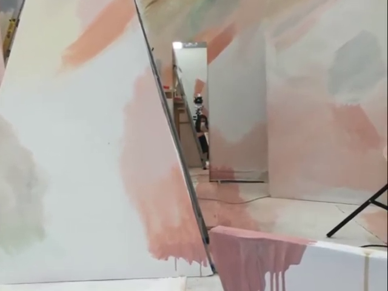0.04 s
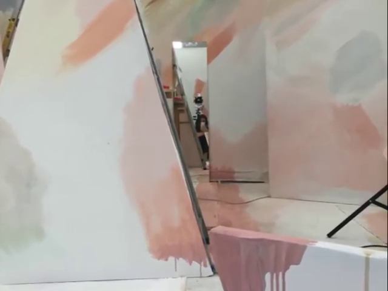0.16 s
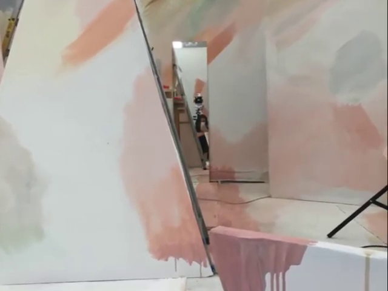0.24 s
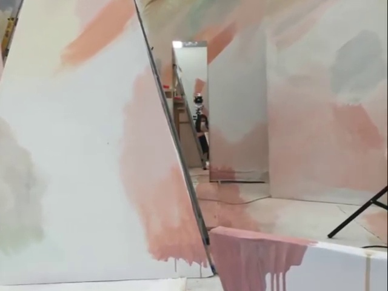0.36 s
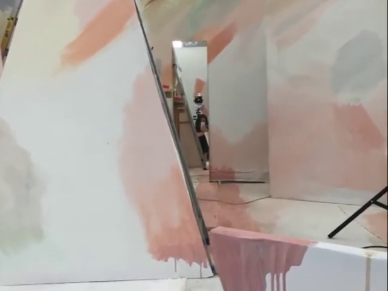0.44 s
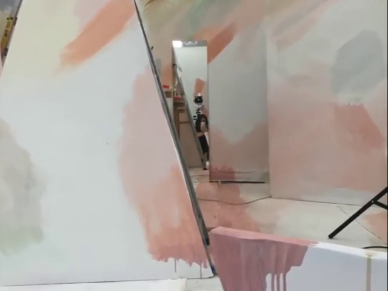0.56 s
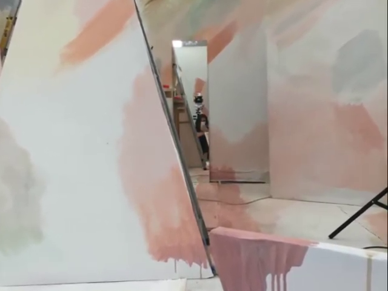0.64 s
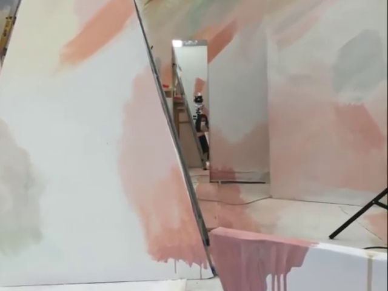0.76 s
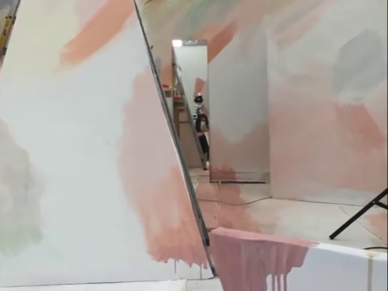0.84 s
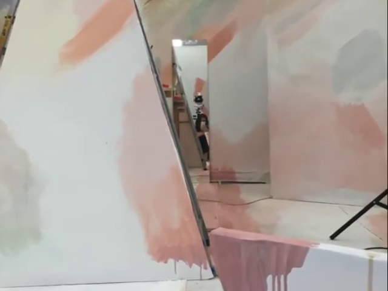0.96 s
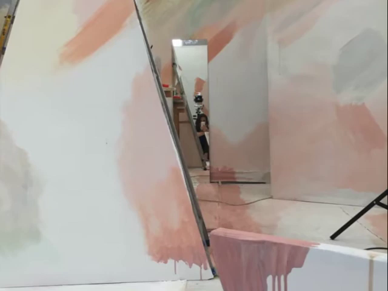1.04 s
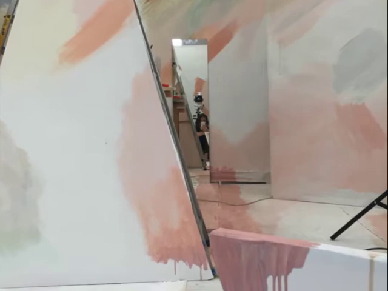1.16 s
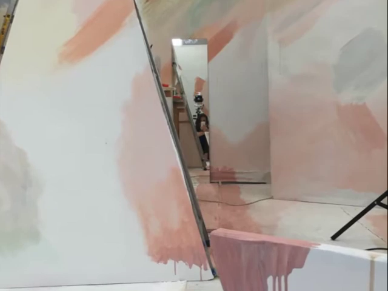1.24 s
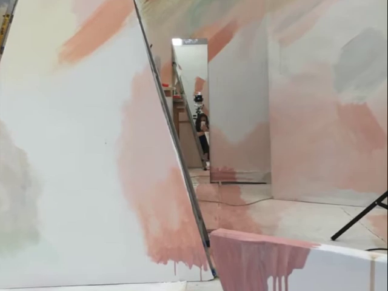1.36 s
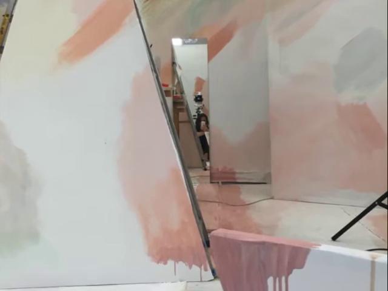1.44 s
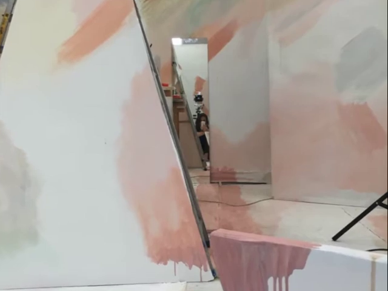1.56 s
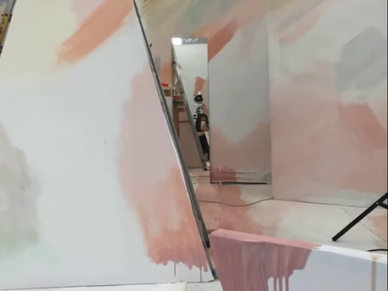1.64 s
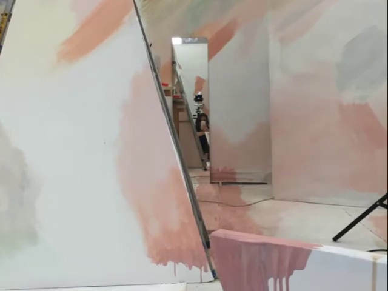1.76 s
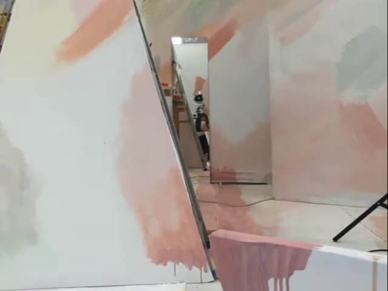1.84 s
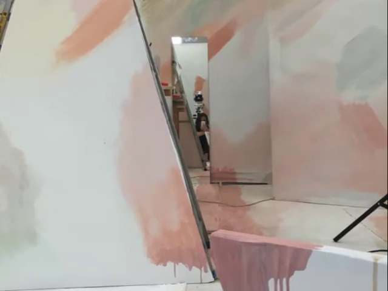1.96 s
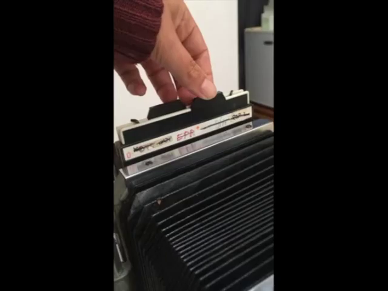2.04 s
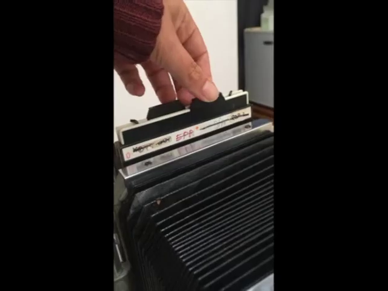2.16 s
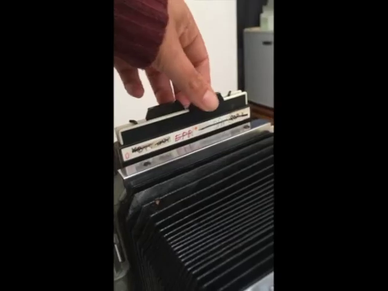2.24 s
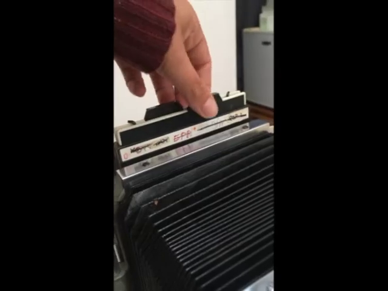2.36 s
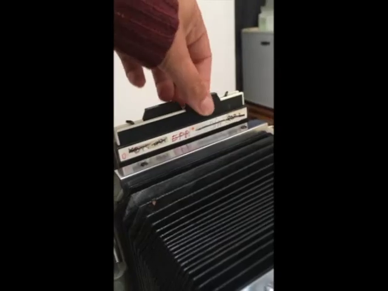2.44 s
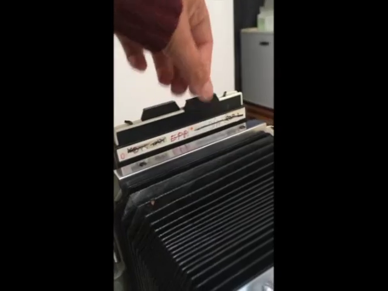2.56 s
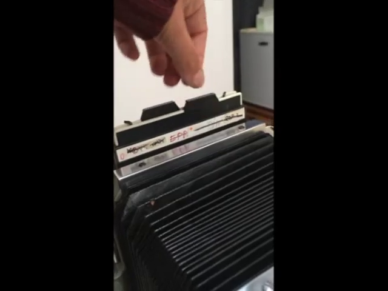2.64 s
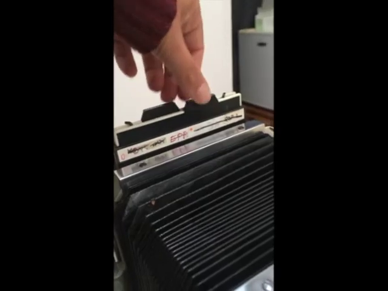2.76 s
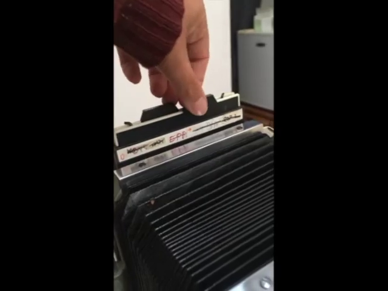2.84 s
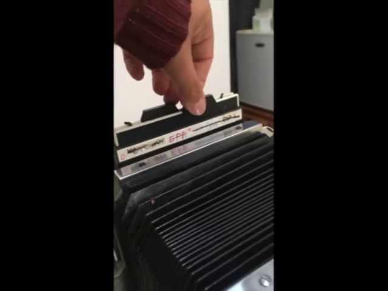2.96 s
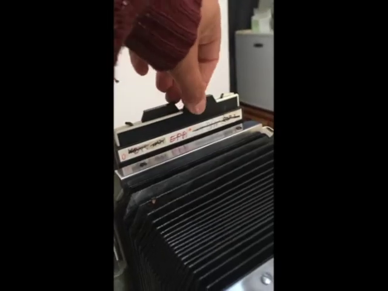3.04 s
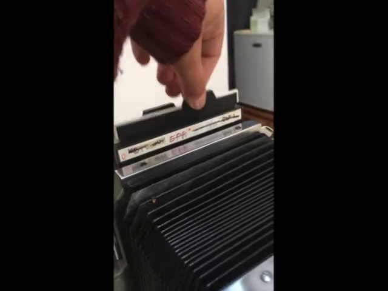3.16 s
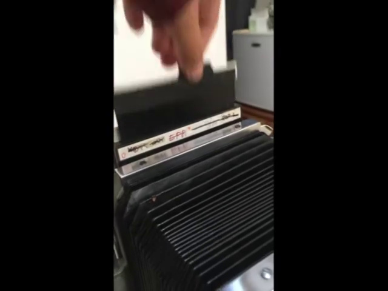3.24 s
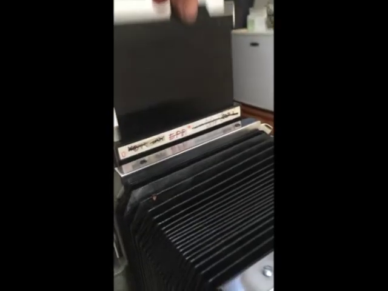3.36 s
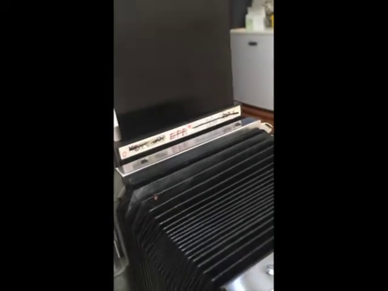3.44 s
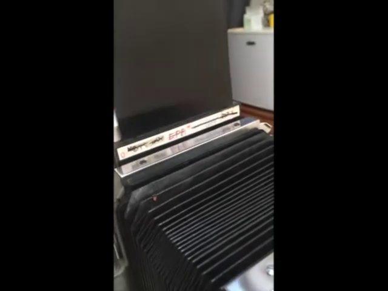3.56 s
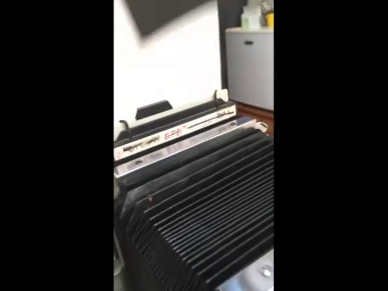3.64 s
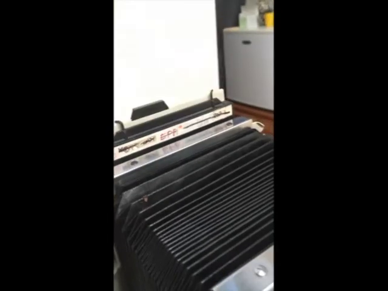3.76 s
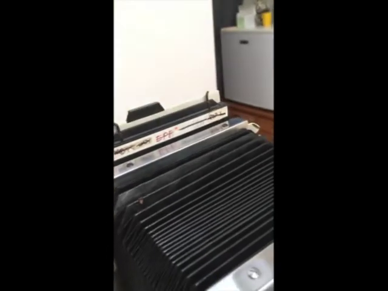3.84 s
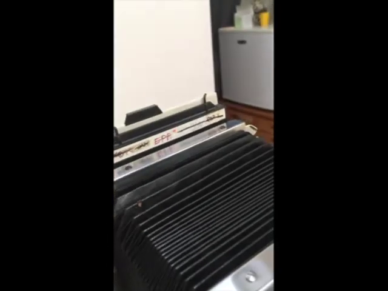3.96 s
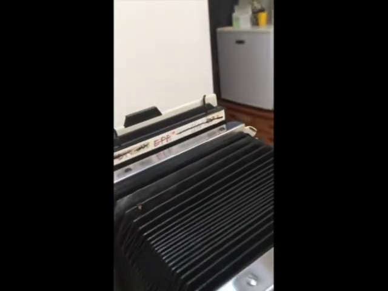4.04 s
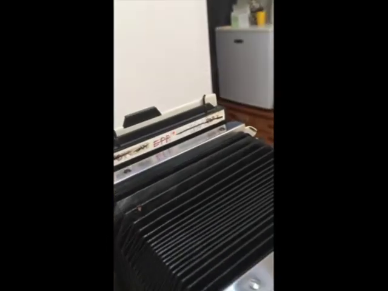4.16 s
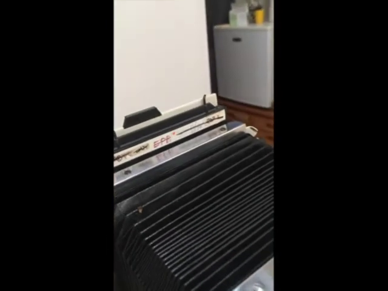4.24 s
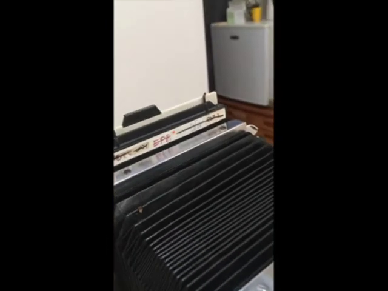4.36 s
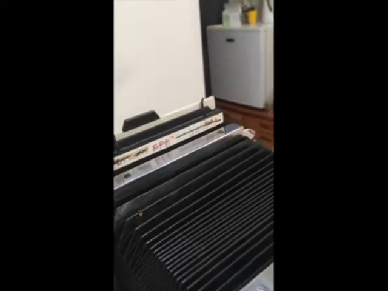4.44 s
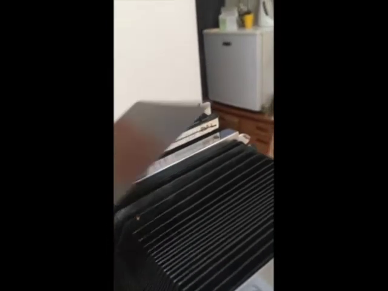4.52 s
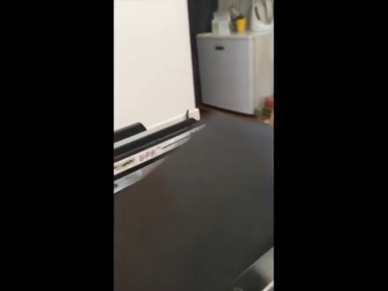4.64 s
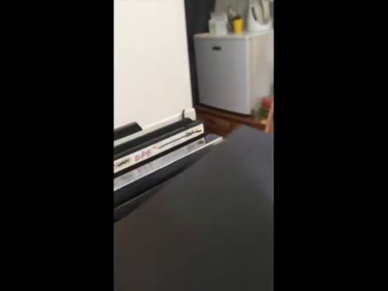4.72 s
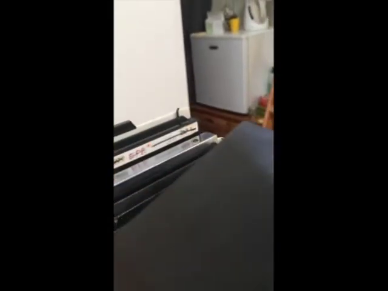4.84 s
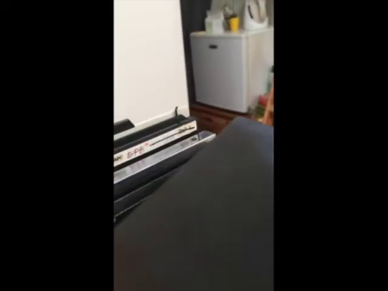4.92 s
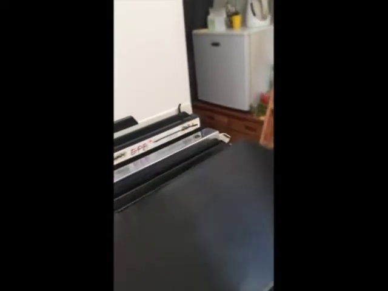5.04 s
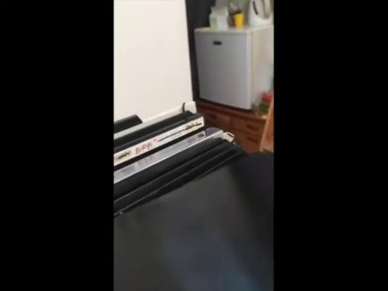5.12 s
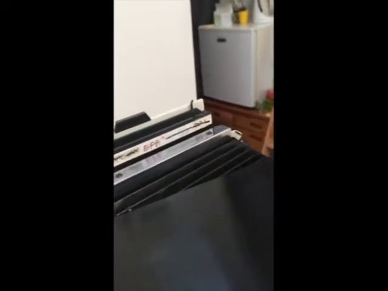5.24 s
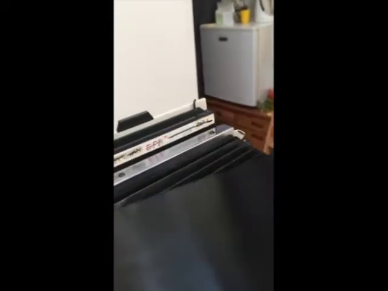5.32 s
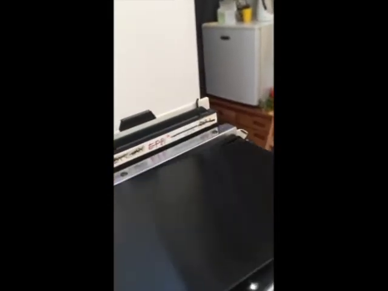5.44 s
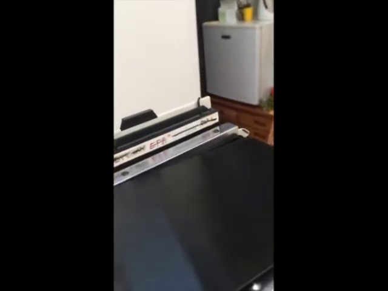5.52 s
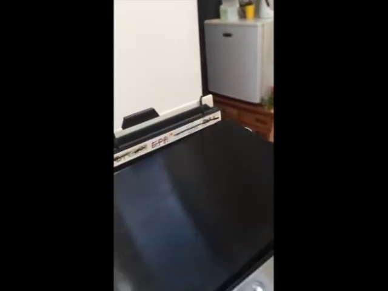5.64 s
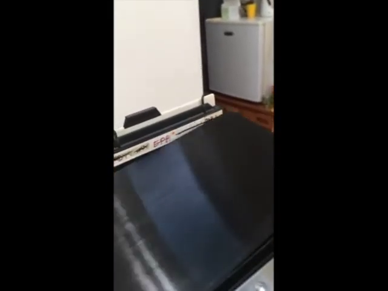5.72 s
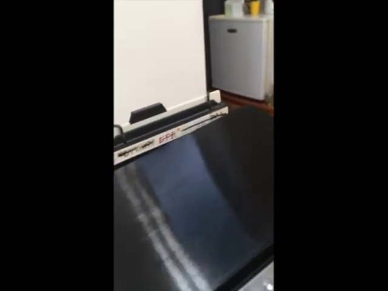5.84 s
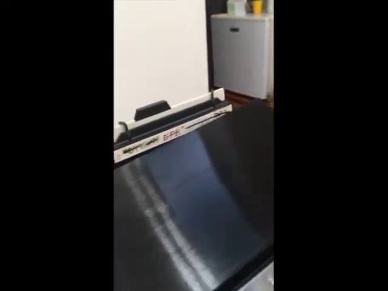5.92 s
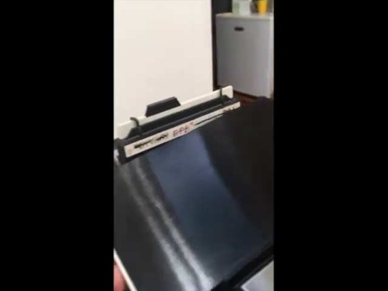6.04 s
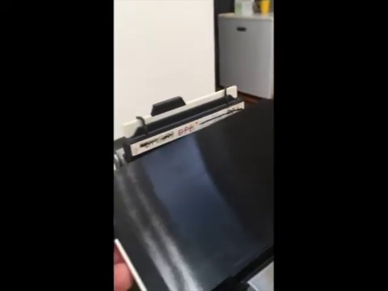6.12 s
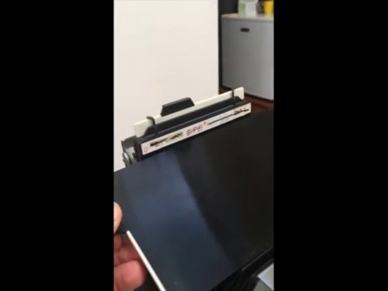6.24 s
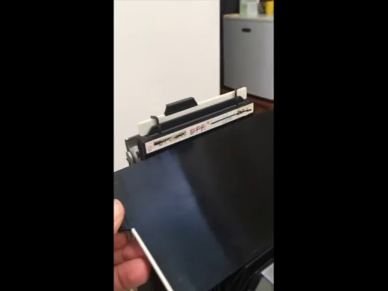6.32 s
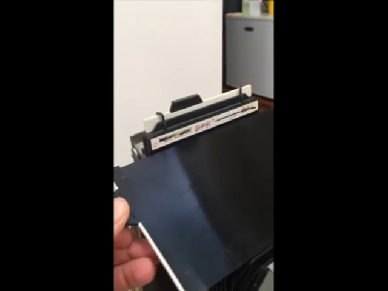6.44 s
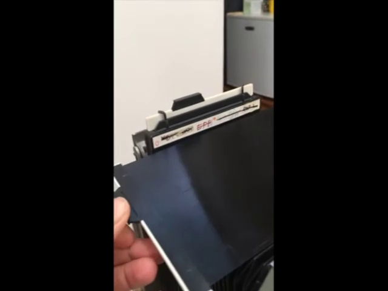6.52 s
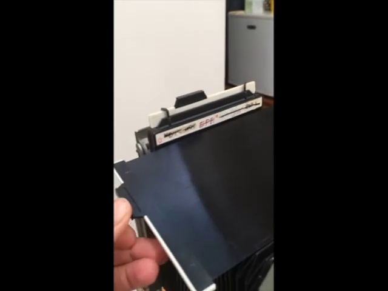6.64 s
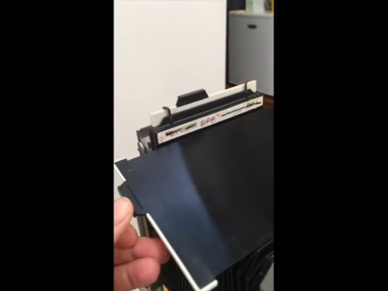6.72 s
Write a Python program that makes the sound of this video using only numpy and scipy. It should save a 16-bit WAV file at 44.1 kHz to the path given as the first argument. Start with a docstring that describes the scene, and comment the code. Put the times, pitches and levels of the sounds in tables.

```python
"""Cloth and soles rustle over a low wavering drone, then soft footfalls come: noise swept by rise and decay.
After a short silent splice, in a second quiet studio room, a plastic dark slide is gripped, drawn scraping
out of a film holder, tapped on the camera and rubbed along it: ticks and dense friction grains ring the
modes of holder and camera body, and the room adds reflections.
Narrow-band noise makes the rumble, and shaped noise the room tone and the hiss of a small microphone."""
import sys
import numpy as np
from scipy import signal
from scipy.fft import rfft, irfft
from scipy.io import wavfile

SR = 44100
rng = np.random.default_rng(int(sys.argv[2]) if len(sys.argv) > 2 else 0)


def dump_mix(stems):
    """Bounce the given channels to the path in sys.argv[1] as a 16-bit WAV at rate SR."""
    frames = np.atleast_2d(stems).T  # one column per channel
    limited = np.clip(frames, -1, 1)  # hard clip at full scale
    pcm = np.round(limited * 32767).astype(np.int16)
    wavfile.write(sys.argv[1], SR, pcm)


def natural_amplitude(level_db):
    """Convert a level in decibels to a linear amplitude factor, elementwise."""
    exponent = np.asarray(level_db, float) / 20
    return 10 ** exponent


N = 299144


def rms_one(x):
    """Normalisation: equal mean power, so that the rms is 1."""
    return x / np.sqrt(np.mean(x ** 2) + 1e-20)


def cut(x, hz, kind, order=2):
    """Butterworth filtering: a maximally flat pass band."""
    return signal.sosfilt(signal.butter(order, hz, kind, fs=SR, output="sos"), x)


def coloured(x, spectrum):
    """Spectral shaping: a steady noise weighted by a curve over log frequency; rms 1."""
    hz, db = np.transpose(spectrum)
    grid_hz = np.maximum(np.fft.rfftfreq(len(x), 1 / SR), 1)
    gain = natural_amplitude(np.interp(np.log(grid_hz), np.log(hz), db))
    return rms_one(irfft(rfft(x) * gain, len(x)))


def in_time(curve):
    """Level envelope: a dB curve as gain per sample, silent outside its span."""
    s, db = np.transpose(curve)
    return natural_amplitude(np.interp(np.arange(N) / SR, s, db, left=-200, right=-200))


def drift(rate_hz):
    """Random modulation: noise low-passed near rate_hz; rms 1."""
    step = 40   # samples per slow value
    r = np.exp(-2 * np.pi * rate_hz * step / SR)
    slow = signal.lfilter([1], [1, -2 * r, r * r], rng.standard_normal(N // step + 2002))[2000:]
    return np.interp(np.arange(N) / step, np.arange(len(slow)), rms_one(slow))


def ring(force, hz, t60_s):
    """Damped resonator: a unit click sets a decaying sine of initial height 1 ringing."""
    r, w = natural_amplitude(-60 / (t60_s * SR)), 2 * np.pi * hz / SR
    return signal.lfilter([0, np.sin(w)], [1, -2 * r * np.cos(w), r * r], force + 1e-18)


def resonance(x, hz, width_hz):
    """Resonant filtering: the bandwidth sets the decay time; rms 1."""
    return rms_one(ring(x, hz, np.log(1000) / np.pi / width_hz))


# the splice: times in s at which the fade out begins, silence begins, the fade in begins, full level returns
SPLICE_S = (1.977, 1.982, 2.007, 2.011)
# spectra of room tone and microphone hiss: pitch_hz [Hz], level_db [dB per Hz, relative]
FIRST_ROOM = [(70, -36), (105, 4), (200, -7.5), (450, -18), (1000, -20.5), (2300, -24.5), (3500, -35),
              (16400, -34)]
SECOND_ROOM = [(70, -22.5), (105, -4), (200, -10.5), (330, -18.5), (520, -27.5), (800, -28), (1050, -25.5),
               (2200, -30.5), (3200, -36.5), (5000, -40.5), (9000, -38.5), (16400, -36)]
FIRST_DB, SECOND_DB = -49.5, -53


def room_tone():
    """Stationary noise: each room has its own steady spectrum."""
    first = natural_amplitude(FIRST_DB) * coloured(rng.standard_normal(N), FIRST_ROOM)
    second = natural_amplitude(SECOND_DB) * coloured(rng.standard_normal(N), SECOND_ROOM)
    return np.where(np.arange(N) / SR < SPLICE_S[2], first, second)


def drone(hz, width_hz, evenness):
    """Narrow-band noise: dividing by its envelope leaves it wandering more in pitch than level; rms 1."""
    x = resonance(resonance(rng.standard_normal(N), hz, width_hz), hz, width_hz)
    envelope = np.abs(signal.hilbert(x))
    return rms_one(x / (envelope + 0.18) ** evenness)


# levels of the two drones: time_s [s], level_db [dB]
DEEP_DRONE = [(0, -45.5), (.7, -48), (.85, -41.5), (1.5, -49.5), (5.2, -56), (5.4, -43), (6.78, -42.5)]
UPPER_DRONE = [(0, -39.5), (.7, -38), (.85, -46.5), (2.3, -49), (3.2, -47), (6.78, -46)]


def rumble():
    """Low-frequency noise from the building or distant traffic: two drones, the upper later higher and looser."""
    early = np.arange(N) / SR < UPPER_DRONE[2][0]
    upper = np.where(early, drone(72.8, 7.3, 0.8), drone(84.7, 43.3, 0.76))
    return in_time(DEEP_DRONE) * drone(44.7, 5.2, 0.94) + in_time(UPPER_DRONE) * upper


# rustles of cloth and soles: peak_s [s], level_db [dB]
SHUFFLES = [(0, -43.5), (.19, -53.5), (.61, -52), (.76, -49), (.99, -57), (1.3, -59.5)]
# spectrum of the rustles: pitch_hz [Hz], level_db [dB per Hz, relative]
SHUFFLE_COLOUR = [(700, 5), (1500, 0.5), (3000, -4), (5000, -8), (15500, -14.5)]
SHUFFLE_RISE_DB_PER_S, SHUFFLE_FALL_DB_PER_S = 195, 139


def shuffle():
    """Exponential envelopes: soft noise swells to each rustle and fades after it."""
    t = np.arange(N) / SR
    level = np.zeros(N)
    for s, db in SHUFFLES:
        drop_db = np.where(t < s, SHUFFLE_RISE_DB_PER_S * (s - t), SHUFFLE_FALL_DB_PER_S * (t - s))
        level += natural_amplitude(db - drop_db)
    return level * coloured(rng.standard_normal(N), SHUFFLE_COLOUR)


# footfalls in the first room: start_s [s], level_db [dB, relative], cutoff_hz [Hz, dullness]
STEPS = [(.581, -41, 780), (.597, -43, 525), (0.966, -43.5, 320)]
STEP_T60_S = 0.45


def steps():
    """Impact noise: dull thuds, fuller at the floor's resonances, swell fast and die with the room."""
    out, t = np.zeros(N), np.arange(SR // 2) / SR
    for (s, level_db, cutoff_hz), noise in zip(STEPS, rng.standard_normal((len(STEPS), len(t)))):
        thud = rms_one(cut(cut(noise, cutoff_hz, "low", order=4), 62, "high"))
        thud += 2.0 * resonance(noise, 220, 53) + 1.13 * resonance(noise, 162, 20)
        at = round(s * SR)
        out[at:at + len(t)] += natural_amplitude(level_db - 60 * t / STEP_T60_S) * np.minimum(t / 0.0016, 1) * thud
    return out


def gate(start_s, length_s):
    """Amplitude envelope of one touch: quick attack, hold, exponential release; gain 0-1."""
    out, at = np.zeros(N), round(start_s * SR)
    t = np.arange(SR // 4) / SR
    attack_s, release_s = 0.012, 0.0045
    out[at:at + len(t)] = np.clip(t / attack_s, 0, 1) * np.exp(-np.maximum(t - length_s, 0) / release_s)
    return out


# squeaks and brushes of a finger on the plate:
# start_s [s], length_s [s], pitch_hz [Hz, band centre], width_hz [Hz], level_db [dB]
SQUEAKS = [(2.21, 0.066, 5400, 2600, -63), (5.348, 0.115, 5540, 180, -56.5), (5.33, .075, 4290, 350, -52),
           (5.434, 0.024, 3380, 330, -40), (5.488, 0.017, 2980, 350, -48.5)]


def squeaks():
    """Friction excitation: noise narrowed to one singing region of the plate."""
    noise = rng.standard_normal(N)
    out = np.zeros(N)
    for s, length_s, hz, width_hz, db in SQUEAKS:
        band = cut(noise, [hz - width_hz / 2, hz + width_hz / 2], "band")
        out += natural_amplitude(db) * gate(s, length_s) * rms_one(band)
    return out


def strike(force, modes, centre_hz, width_oct, chance):
    """Modal excitation: modes near a centre ring; grip and place vary their strength and pitch; peak 1."""
    rung = np.zeros(len(force))
    for (hz, db, t60_s), gain_db, detune in zip(modes, 2 * chance, 1 + .02 * chance[::-1]):
        off_centre_db = 5.8 * (np.log2(hz / centre_hz) / width_oct) ** 2
        rung += natural_amplitude(db + gain_db - off_centre_db) * ring(force, hz * detune, t60_s)
    return rung / np.abs(rung).max()


# contacts of slide and fingers on holder and camera:
# start_s [s], level_db [dB, relative], pitch_hz [Hz, centre of ring], crack_db [dB, relative], chatter_ms [ms]
CONTACTS = [(2.35, -52.5, 840, -0.5, 1.3), (2.485, -21, 2600, -12.5, 2.6), (2.762, -41.5, 1490, -15.5, 4),
            (3.076, -14.5, 1300, -17, 1.3), (3.121, -20.5, 2004, -25, 6.6), (3.462, -5, 2348, -12.5, 2),
            (3.505, -12, 1150, -15, 3.1), (3.527, -18, 2600, -8.5, 2.3), (3.543, -22, 980, -2.5, 1.1),
            (4.468, 3.5, 2480, -15, 0.97), (4.479, -4, 1900, -10.5, 1.2), (4.484, -15, 960, -13.5, 1),
            (4.754, 2.5, 1038, -14, 1.5), (4.757, -9.5, 925, -33, 3), (4.765, -7, 1420, -16, 0.64),
            (4.823, -5.5, 1100, -15, 2.6), (4.909, -27.5, 600, -18.5, 5.8), (5.099, -25, 1140, -27, 5.3),
            (5.18, -23, 760, -13, 1.66), (5.218, -31.5, 900, -17, 5), (5.248, -29, 950, -23, 7),
            (5.572, -5, 4100, -8, 0.92), (5.589, -19.5, 1020, -8, 1.4), (5.614, -25, 900, -8, 2.5),
            (5.628, -21, 1030, -10, 1.5), (5.932, -25, 1440, -15, 1.7), (5.942, -18, 900, -14, 1.17),
            (5.948, -18, 1230, -23.5, 2.04), (6.106, -31, 820, -23, 3.7), (6.21, -29, 1350, -19, 3.1)]
# the slide's edge catches in the slot while drawn: start_s [s], level_db [dB, relative], pitch_hz [Hz]
CATCHES = [(3.165, -23, 4400), (3.178, -27, 870), (3.201, -23, 2220), (3.229, -24.5, 1640),
           (3.284, -24, 3400), (3.308, -24, 3070), (3.336, -23, 3270), (3.38, -24, 2890)]
CATCH_CRACK_DB, CATCH_CHATTER_MS = -18, 1.6   # the same two columns for every catch
# modes of the holder and slide: pitch_hz [Hz], level_db [dB, relative], t60_s [s, ringing free]
HOLDER = [(790, -10, 0.024), (933.4, -7.5, 0.11), (1178, -6.5, 0.02), (1420, -1, 0.011), (1765, -2, 0.018),
          (2317, 4.5, 0.0099), (2710, 11, 0.0054), (3186, 11, 0.014), (3576, 1, 0.02), (4250, 6, 0.019),
          (5590, 13, 0.0057), (6370, 7, 0.017), (10050, 4, 0.019)]
# spans when no hand damps the holder and it rings on: start_s [s], end_s [s]
LOOSE_S = [(3.5, 3.6), (4.46, 4.5), (5.56, 5.6)]
SETTLE_DB, SETTLE_S, SETTLE_HZ = -24, 0.014, (600, 2600)


def contacts():
    """Impact excitation: a tick inside a short dying chatter rings the holder and cracks in the treble."""
    size, lead = 4096, 40   # samples
    out, t = np.zeros(N + size), np.arange(size) / SR
    rows = CONTACTS + [(*row, CATCH_CRACK_DB, CATCH_CHATTER_MS) for row in CATCHES]
    # a hand on the holder stops its longer rings
    held = [(hz, db, min(.55 * t60_s, .025)) for hz, db, t60_s in HOLDER]
    noises = rng.standard_normal((len(rows), size))
    for (s, level_db, centre_hz, crack_db, chatter_ms), noise in zip(rows, noises):
        # the edges graze for a millisecond before they meet
        force = .5 * noise * np.exp(-1000 * t / chatter_ms) * np.minimum(np.arange(size) / lead, 1) ** 3
        force[lead] = 1
        force = cut(force, max(600, 0.45 * centre_hz), "high")   # a thin plate radiates no bass
        modes = HOLDER if any(a < s < b for a, b in LOOSE_S) else held
        rung = strike(force, modes, centre_hz, 0.72, noise[-40:])
        # after a contact the parts rattle dully into place
        settle = rms_one(cut(noise[::-1], SETTLE_HZ, "band")) * np.exp(-t / SETTLE_S) * np.minimum(t / 0.0012, 1)
        crack = cut(force, [5500, 15500], "band")
        here = slice(round(s * SR), round(s * SR) + size)
        out[here] += natural_amplitude(level_db - 3.0) * rung
        out[here] += natural_amplitude(level_db + SETTLE_DB) * settle
        out[here] += natural_amplitude(level_db + crack_db + 14.0) * crack / np.abs(crack).max()
    return out[:N]


def snags():
    """Sparse impulses: now and then the edge catches and briefly rings one mode of the holder; rms 1."""
    ticks = (rng.random(N) < 420 / SR) * natural_amplitude(rng.uniform(-6, 6, N))   # about 420 per s
    dealt = rng.integers(0, len(HOLDER), N)   # which mode each tick rings
    out = np.zeros(N)
    for k, (hz, db, t60_s) in enumerate(HOLDER):
        out += ring(ticks * (dealt == k), hz, min(.45 * t60_s, .009))
    return rms_one(out)


# short rubs of slide and fingers, each changing steadily by swell_db before it stops:
# start_s [s], length_s [s], hiss_db [dB, fine hiss at the end], swell_db [dB], weight_db [dB, grit over hiss]
SCUFFS = [(2.388, 0.096, -49.5, 17.5, -2.5), (2.479, 0.014, -38, 5, 5), (2.506, 0.024, -51, -6.5, 6.5),
          (3.446, 0.036, -30.5, -9, -19), (3.478, 0.014, -16, 6, -20.5), (3.502, 0.028, -47.5, 10, 10.5),
          (4.858, 0.11, -39.5, 17, -15.5), (4.972, .07, -61.5, -10, -0.5), (5.262, 0.034, -39, 9, -30),
          (5.304, 0.034, -40, 2, -19), (5.342, 0.077, -48, -10, -35), (5.432, 0.033, -52, -6, -12),
          (5.479, .046, -43, 5.5, -18), (5.527, 0.018, -28, -14, -7), (5.572, 0.025, -35.5, 24, -14),
          (5.616, 0.023, -40, -6.5, -6.5), (5.923, 0.026, -42, 14, 7), (6.113, 0.05, -79, -1.5, 25)]
# the slide drawn out of its slot, hissing more as it speeds up: time_s [s], hiss_db [dB]
PULL = [(3.074, -52), (3.115, -43.5), (3.2, -34), (3.375, -32.5), (3.4, -28.5), (3.45, -37.5)]
PULL_GRIT_DB, GRIT_FADE_DB_PER_S = -42.5, 25   # grit at the start, fading as the slide frees
PULL_SQUEAL_DB = -35   # at the loudest hiss
SQUEAL_DB, SQUEAL_PER_WEIGHT = 2.5, 0.85   # squeal over hiss grows with weight until grit takes over
SHEEN_DB, SHEEN_PER_WEIGHT = -7, -0.088   # the lighter the touch, the more of the very top


def rubbing_levels():
    """Friction level: grit, squeal, hiss and sheen follow each scuff's weight and the speed of the pull."""
    t, pull = np.arange(N) / SR, in_time(PULL)
    drawn = pull > natural_amplitude(-150)
    grit = natural_amplitude(PULL_GRIT_DB - GRIT_FADE_DB_PER_S * (t - PULL[0][0]))
    out = drawn * np.array([grit, natural_amplitude(PULL_SQUEAL_DB) * pull / pull.max(), pull, 0 * pull])
    for s, length_s, hiss_db, swell_db, weight_db in SCUFFS:
        level = gate(s, length_s) * natural_amplitude(hiss_db - swell_db * np.clip(1 - (t - s) / length_s, 0, 1))
        squeal_db = SQUEAL_DB + SQUEAL_PER_WEIGHT * min(weight_db, 0)
        sheen_db = SHEEN_DB + SHEEN_PER_WEIGHT * weight_db
        out += level * natural_amplitude([[weight_db], [squeal_db], [0], [sheen_db]])
    return out


# spectrum of the rubbing hiss: pitch_hz [Hz], level_db [dB per Hz, relative]
RUB_HISS = [(5000, -16.5), (6500, -4.5), (11400, 2), (15300, 3.5), (16400, -32)]
GRIT_HZ, SQUEAL_HZ, SHEEN_HZ = (676, 2870), (2080, 6240), 13000   # two bands and a lower edge
RASP_DB, RASP_PER_S, SHEEN_FLUTTER_DB = 3.5, 90, 4   # low layers jerk coarser than hiss, the top flutters alone
HELD_FREEDOM, LOOSE_FREEDOM, SLIDE_OUT_S = .25, 1.5, 4   # how freely the plate sings in the slot, then in hand


def strokes():
    """Stick-slip friction: dense grains in uneven bursts ring modes that come and go each on its own."""
    freedom = np.where(np.arange(N) / SR < SLIDE_OUT_S, HELD_FREEDOM, LOOSE_FREEDOM)
    sizes = natural_amplitude(3 * np.minimum(rng.exponential(1, N), 3))
    grains = rms_one((rng.random(N) < 6000 / SR) * sizes * rng.choice([-1, 1], N))   # about 6000 per s
    rung = np.zeros(N)
    for hz, db, t60_s in HOLDER:
        wavering = grains * natural_amplitude(3.5 * drift(43))
        rung += natural_amplitude(db) * rms_one(ring(wavering, hz, t60_s))
    rung = freedom * rms_one(rung)
    slip = natural_amplitude(2.8 * drift(46))
    caught = (grains + 0.66 * snags()) * natural_amplitude(RASP_DB * drift(RASP_PER_S))
    grit = cut(caught + 0.18 * rung, GRIT_HZ, "band", order=3)
    squeal = cut(caught + 0.65 * rung, SQUEAL_HZ, "band")
    hiss = coloured(grains + 1.3 * rng.standard_normal(N) + rung, RUB_HISS)
    sheen = cut(rng.standard_normal(N), SHEEN_HZ, "high", order=4) * natural_amplitude(SHEEN_FLUTTER_DB * drift(30))
    even = np.hypot(1, 0.37 * freedom)   # singing shares the energy of the stroke
    layers = zip(rubbing_levels(), (grit, squeal, hiss, sheen))
    return sum(level * slip * rms_one(x / even) for level, x in layers)


# heavier contacts that reach the hollow body:
# start_s [s], level_db [dB, peak], pitch_hz [Hz, centre of boom], damping [0-1, by the hand]
KNOCKS = [(2.489, -22, 179, 0.7), (3.079, -28.5, 152, 0.79), (3.468, -27, 223, 0.74),
          (3.544, -28, 202, 0.69), (4.47, -23.5, 134, 0.61), (4.756, -8.5, 245, 0.61),
          (4.767, -5, 171, 0.86), (4.827, -15.5, 217, 0.16), (4.961, -25.5, 116, 0.23),
          (5.256, -33.5, 420, 0.8), (5.538, -30.5, 380, 0.66), (5.634, -28.5, 181, 0.84),
          (5.943, -25, 160, 0.35)]
# modes of the hollow camera body and bellows:
# pitch_hz [Hz], level_db [dB, relative], t60_s [s, undamped], rise [share of pitch per s]
BODY = [(114, 7, 0.2, 0.07), (157.2, -1, 0.45, 0.053), (205.6, 3, 0.56, 0.016), (305.7, 11, 0.32, 1.2),
        (390, 4.5, 0.11, 0)]


def knocks():
    """Cavity resonance: a soft push booms the hollow body; a hand damps it and the next knock chokes it."""
    size = 16384   # samples
    out, t = np.zeros(N + size), np.arange(size) / SR
    gaps = np.diff([row[0] for row in KNOCKS] + [N / SR])
    chances = rng.standard_normal((len(KNOCKS), len(BODY)))
    for (s, level_db, centre_hz, damping), gap_s, chance in zip(KNOCKS, gaps, chances):
        boom = np.zeros(size)
        for (hz, db, t60_s, rise), gain_db in zip(BODY, chance):
            off_centre_db = 5.6 * (np.log2(hz / centre_hz) / .45) ** 2
            fall_db = 60 * t / (t60_s * (1 - damping))
            tone = np.sin(2 * np.pi * hz * t * (1 + rise * t / 2))
            boom += natural_amplitude(db + gain_db - off_centre_db - fall_db) * tone
        boom = cut(boom, 530, "low", order=1) * np.exp(-np.maximum(t - gap_s, 0) / 0.013)
        at = round(s * SR)
        out[at:at + size] += natural_amplitude(level_db) * boom / np.abs(boom).max()
    return out[:N]


ROOM_T60_S, TREBLE_T60_S, WALL_CUT_HZ, ROOM_DB = 0.39, 0.11, 8100, -20


def room(x):
    """Reverberation: dense reflections decay exponentially, the treble faster."""
    t = np.arange(SR // 2) / SR
    noise = rng.standard_normal(len(t))
    dull = cut(noise, WALL_CUT_HZ, "low", order=1)
    tail = dull * natural_amplitude(-60 * t / ROOM_T60_S) + (noise - dull) * natural_amplitude(-60 * t / TREBLE_T60_S)
    tail *= np.clip((t - .003) / 0.0011, 0, 1)   # first reflections come late
    tail = cut(tail, 200, "high")
    return natural_amplitude(ROOM_DB) * signal.fftconvolve(x, tail / np.sqrt(np.sum(tail ** 2)))[:N]


def scene():
    """Superposition: handling sounds with their room, over the backgrounds."""
    near = squeaks() + contacts() + strokes()
    return (room_tone() + rumble() + shuffle() + steps() + near + room(near) + knocks())[None]


def top_cut(x):
    """Nothing passes above the cut-off."""
    return signal.sosfilt(signal.butter(12, 16500, fs=SR, output="sos"), x)


# cancellations at the microphone port: pitch_hz [Hz], width_hz [Hz], level_db [dB]
PORT_DIPS = [(4930, 530, -4.5), (7790, 1050, -4.5), (10260, 790, -6.5)]


def record(dry):
    """Transduction: band limits and port cancellations of the microphone, the splice, then soft overload."""
    heard = cut(cut(dry, 26, "high", order=3), 15500, "low", order=10)
    for hz, width_hz, db in PORT_DIPS:
        heard = heard - (1 - natural_amplitude(db)) * signal.lfilter(*signal.iirpeak(hz, hz / width_hz, SR), heard)
    splice = np.interp(np.arange(N) / SR, SPLICE_S, [0.83, 0.0066, 0.0052, 1])   # gains
    mix = 1.47 * np.tanh(heard * splice / 1.537)
    return top_cut(mix)


dry = scene()
out = record(dry)
dump_mix(out)
```